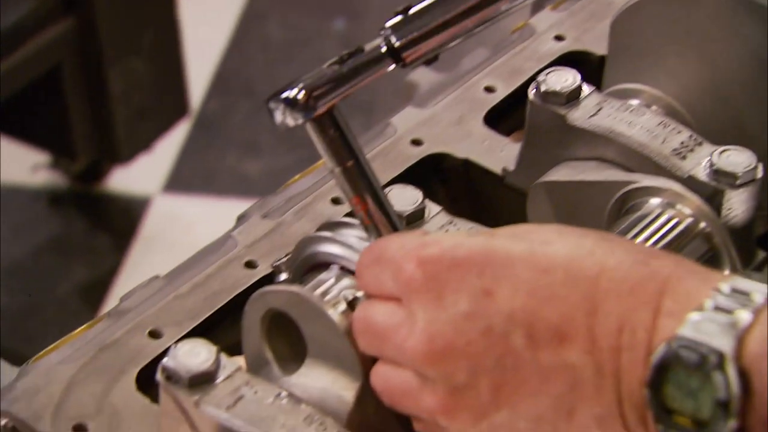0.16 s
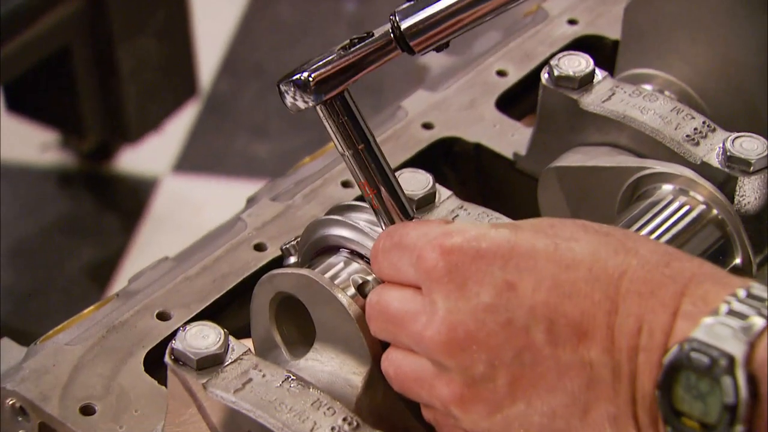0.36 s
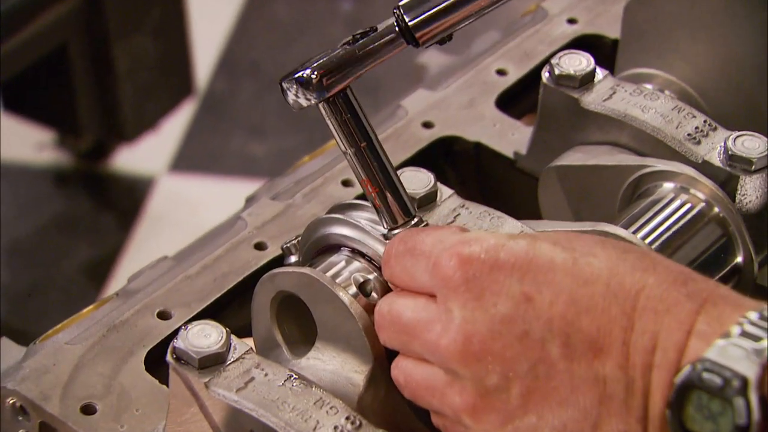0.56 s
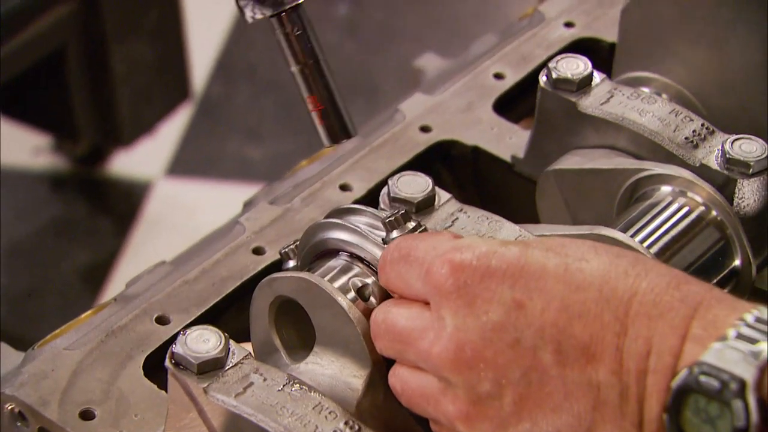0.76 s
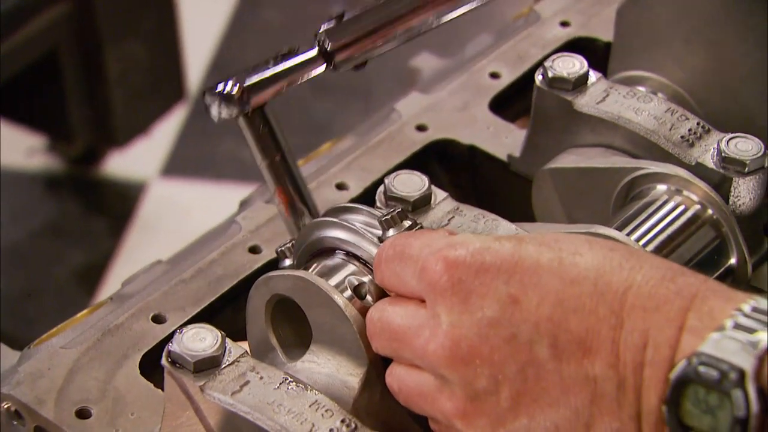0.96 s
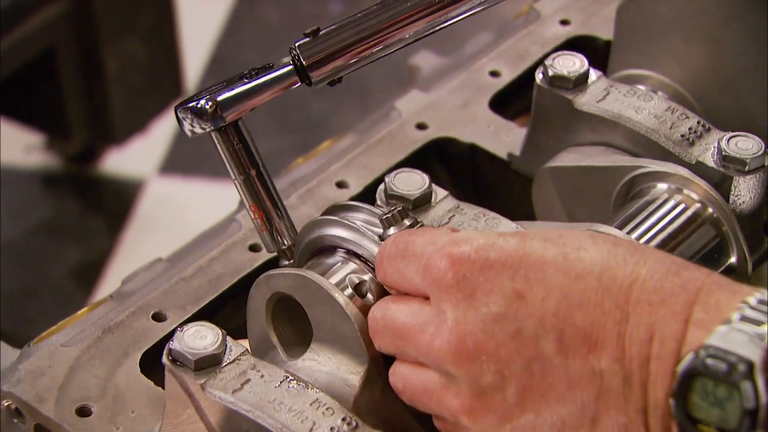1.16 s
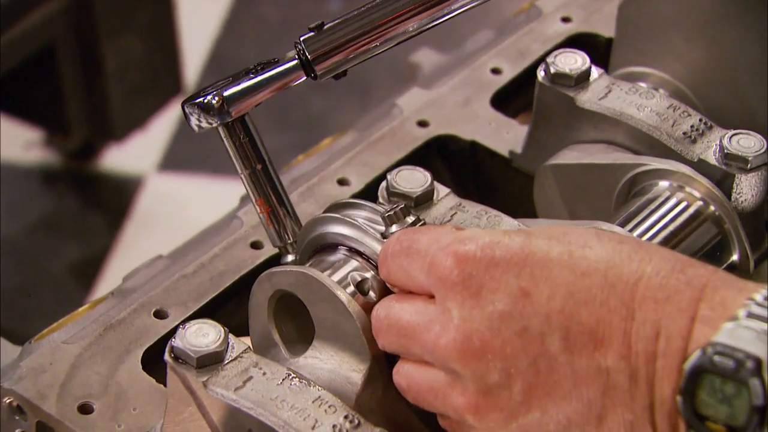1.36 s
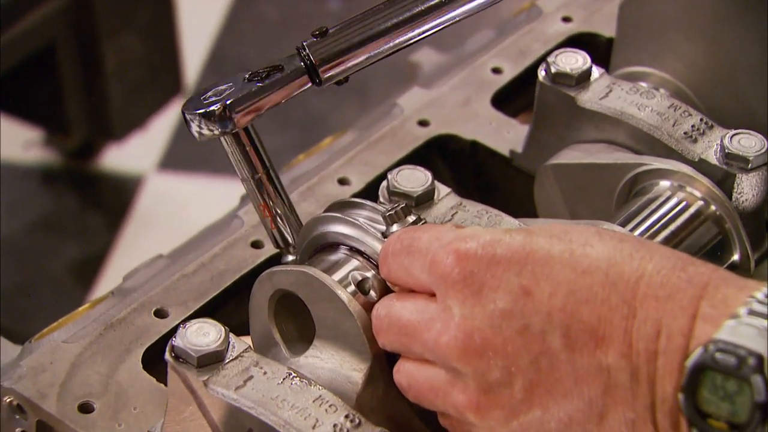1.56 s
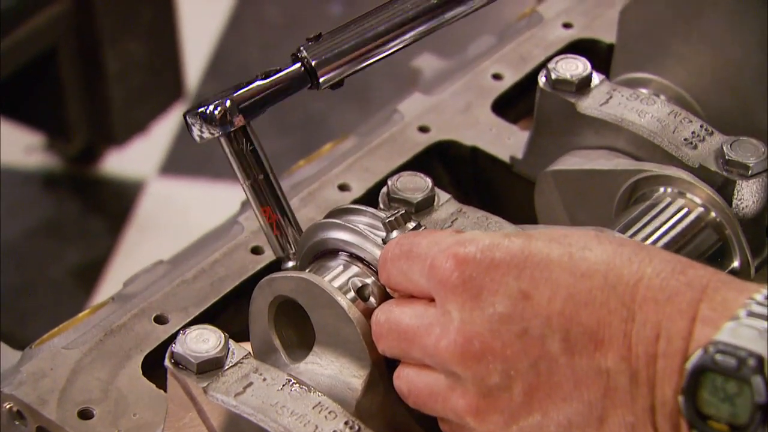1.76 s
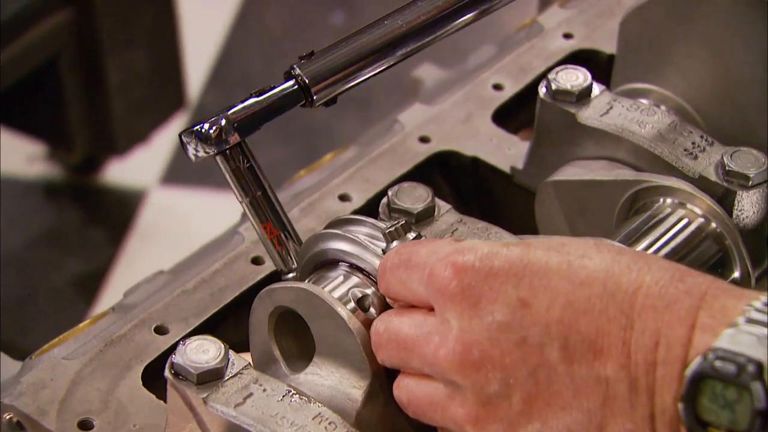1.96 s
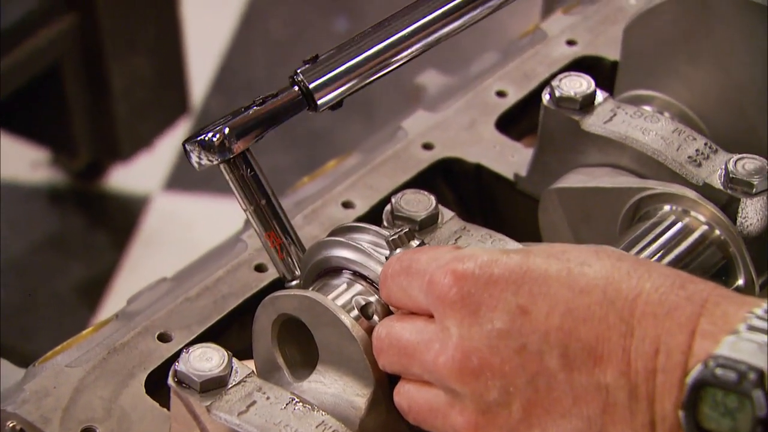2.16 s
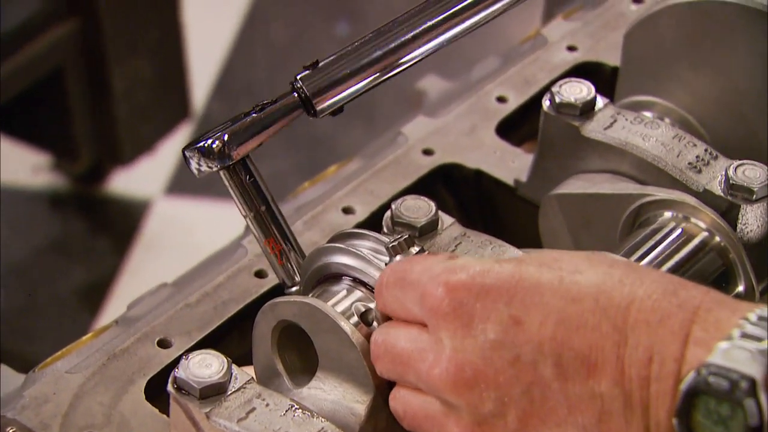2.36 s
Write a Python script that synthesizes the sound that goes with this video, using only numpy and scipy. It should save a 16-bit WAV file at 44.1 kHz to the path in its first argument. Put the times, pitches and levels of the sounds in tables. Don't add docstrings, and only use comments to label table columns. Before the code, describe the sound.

Close up, a torque wrench snaps loudly and clacks back, both clicks echoing through a big hall. Quiet steel ticks and a brief scrape follow as the socket is seated, over faint fans and rushing air.

```python
import sys
import numpy as np
from scipy import signal
from scipy.fft import rfft, irfft, next_fast_len
from scipy.io import wavfile
from scipy.ndimage import map_coordinates

SR = 44100
rng = np.random.default_rng(int(sys.argv[2]) if len(sys.argv) > 2 else 0)


def to_wav(s):
    ch = np.atleast_2d(s).T
    pcm = np.round(np.clip(ch, -1, 1) * 32767)
    wavfile.write(sys.argv[1], SR, pcm.astype(np.int16))


def decibels_to_gain(level_db):
    exponent = np.asarray(level_db, float) / 20
    return 10 ** exponent


N = 105840

# [f/Hz, level/dB per Hz]
AIR_COLOUR = [(60, -23.5), (250, 2), (800, -3.5), (2500, -12), (5500, -17.5), (7500, -27), (9500, -37.5),
              (16500, -47.5)]
# [f/Hz, width/Hz, level/dB]
FAN_DRONES = [(79.21, 9.4, -59), (130.42, 9.4, -61), (183.3, 12, -71.5), (250.4, 30, -77.5)]
# [f/Hz, level/dB]
EARLIER_COLOUR = [(1000, -30.5), (2500, -10.5), (5000, 1.5), (6500, -4), (8500, -21.5)]
# [f/Hz, t60/s]
HALL_T60 = [(200, 1.), (1000, 1.2), (4000, 1.085), (7000, 0.85), (10000, 0.52), (16000, 0.45)]
# [f/Hz, level/dB]
HALL_COLOUR = [(200, -12), (1000, -9), (4000, 1.5), (9000, -1.5), (11000, 2.5), (16000, -4.5)]
# [f/Hz, level/dB]
THREAD_COLOUR = [(3000, -16.5), (6000, 12), (11000, -18), (14500, -17)]
# [f/Hz, level/dB]
LIFT_COLOUR = [(200, -18.5), (380, 3), (700, -11), (1050, -0.5), (1400, -37)]
# [t/s, length/s, start f/Hz, end f/Hz, level/dB]
SQUEAKS = [
    (.640, 0.0144, 12400, 13600, -62),
    (0.644, 0.0143, 12000, 12400, -69),
    (.647, 0.0103, 13900, 14300, -68.5),
    (.653, 0.0102, 14800, 14900, -63.5),
    (0.659, .014, 15100, 15500, -84.5),
    (0.661, 0.0126, 12130, 11900, -70),
    (0.663, 0.012, 11270, 11200, -70),
    (1.56, .16, 9450, 9200, -94),
    (1.58, .1, 12900, 13900, -97),
    (1.753, .2, 11270, 11000, -99),
]
# [f/Hz, level/dB]
SCRAPE_COLOUR = [(500, -8.5), (1200, -3.5), (2300, 2), (3000, 5.5), (4200, -21.5), (5300, -16.5),
                 (9000, -34)]
# [t/s, peak level/dB, brightness/dB per octave, contact f/Hz]
KNOCKS = [(1.0383, -34, -1, 2604), (1.0443, -30.5, 2.5, 5012), (1.0481, -36.5, -4.5, 2324),
          (1.0525, -35.5, -2, 2304), (1.059, -45.5, 0, 5300), (1.073, -52.5, -1, 5300),
          (1.081, -59, 2.5, 5040), (1.089, -56, -8, 2268), (1.0984, -36, 0, 2630),
          (1.1067, -47.5, -3, 2440), (1.1114, -46, -1, 2454), (1.122, -50.5, -3, 2634),
          (1.128, -49.5, -6.5, 2936), (1.134, -51.5, -4, 2360), (1.143, -55, -2.5, 2436),
          (1.268, -59.5, -0.5, 5010), (1.3723, -57.5, -10, 2900), (1.3775, -57.5, -9.5, 2110),
          (1.386, -59.5, -5, 1700), (1.3932, -45, -2.5, 2960), (1.400, -48, -10.5, 2262),
          (1.4070, -41.5, -4, 5548), (1.4114, -44, -4.5, 3687), (1.415, -46, -3.5, 2296),
          (1.425, -54.5, -8, 2310), (1.432, -59.5, -2, 3295), (1.5237, -54.5, 0.5, 1200),
          (1.531, -55, -4, 3292), (1.628, -51.5, -2, 3322), (1.786, -58.5, -6, 1500),
          (1.7961, -62, 5, 8110), (1.911, -58, -7, 1622), (2.1297, -69.5, 8.5, 7500)]
# [f/Hz, level/dB, t60/s]
SOCKET_TONES = [(1200, -11, 0.089), (1562.5, -9.5, 0.177), (2044, -5, 0.096), (2251.4, 1.5, 0.107),
                (2487, -1, 0.1006), (3227, -8, 0.106), (3808, -9, 0.067), (4221, -11.5, 0.101),
                (4898, -6, 0.094), (5400, -1.5, 0.0693), (6114, -9.5, 0.04), (6868, -4.5, 0.044)]
# [f/Hz, level/dB]
KNOCK_CRACK = [(300, -14), (1200, -4), (2500, 6), (4400, -4.5), (5500, 2.5), (8000, -11.5), (12000, -24.5),
               (16000, -36)]
# [t/s, peak level/dB]
TRIPS = [
    (.2419, -.6),
    (.2650, -26),
]
# [t/s, peak level/dB]
RESETS = [
    (.5246, -7.2),
    (.5345, -23),
    (.5405, -33),
    (.5484, -33),
]
# [f/Hz, width/Hz, level/dB]
TRIP_SNAP = [(1196, 250, -16.5), (1726, 350, -2.5), (2204, 320, -10), (3046, 420, -6), (3940, 460, -9.5),
             (4856, 220, -7), (5300, 290, 1), (7094, 370, -4.5), (7911, 450, -16.5), (8775, 307, -6.5),
             (10180, 300, -21), (13220, 467, -18.5), (14100, 230, -17.5), (15500, 820, -13.5)]
RESET_SNAP = [(700, 131, -24.5), (1080, 170, -21), (1903, 350, 5), (2379, 260, -6), (3719, 453, 10.5),
              (4569, 410, 6.5), (5340, 210, -5), (7500, 573, 1.5), (8650, 330, -24.5), (10150, 380, -22.5),
              (11630, 502.6, -14), (12910, 470, -20.5), (15400, 700, -18.5)]
# [f/Hz, level/dB, t60/s]
TRIP_RING = [(1184, -7.5, 0.047), (3073, -10.5, 0.13), (3820, 0, 0.045), (4494, -32, 0.0775),
             (4928, -12.5, 0.0083), (6230, -24.5, 0.081), (6740, -7.5, 0.05), (7610, -7, 0.037),
             (8442, -24, 0.25), (8573, -12.5, 0.015), (11000, 0.5, 0.03), (12371, -29, 0.44)]
RESET_RING = [(1040, -10.5, 0.013), (2377, 0, 0.0344), (3243, -17.5, 0.32), (4090, -10.5, 0.051),
              (4110, -5, 0.036), (5660, -11.5, 0.04), (5286, -6, 0.045), (7220, -12.5, 0.38),
              (8840, -20.5, 0.0324), (10100, -39.5, 0.16), (10870, -16, 0.035), (14825, -32, 0.032)]
# [f/Hz, level/dB, t60/s]
BLOCK_TONES = [(237.3, 13.5, 0.026), (295.6, -9, 0.4), (1095, -16, .14), (1171, -13, 0.15),
               (1551, -15.5, 0.15), (10970, -29, 0.31)]
# [f/Hz, level/dB]
TRIP_BLOW = [(300, -25.5), (1700, -6), (3000, -6.5), (5200, -2.5), (7500, -10), (10500, -17),
             (16000, -19.5)]
RESET_BLOW = [(300, -10), (1700, -4.5), (3500, -2), (5500, -1), (7500, -15), (10000, -24.5), (16000, -35)]
# [snap level/dB, ring level/dB, block level/dB, crack level/dB, blow into the hall level/dB]
TRIP_LEVELS = (0, -27, -33, -14.5, 14)
RESET_LEVELS = (-3, -21.5, -32.5, -11.5, 11.5)
# [f/Hz, level/dB]
REBOUND_COLOUR = [(1500, -23), (3000, -6.5), (5300, -1.5), (8000, -4.5), (11000, -15.5)]


def unit(x):
    return x / np.sqrt(np.mean(x ** 2) + 1e-20)


def along(points, hz):
    f, v = np.transpose(points)
    return np.interp(np.log(hz + 1), np.log(f + 1), v)


def filtered(x, response):
    m = next_fast_len(len(x) + 8192)
    return irfft(rfft(x, m) * response(np.fft.rfftfreq(m, 1 / SR)), m)[:len(x)]


def noise(colour, size):
    return unit(filtered(rng.standard_normal(size), lambda hz: decibels_to_gain(along(colour, hz))))


def ring(tones, t, scatter_db, rough):
    hz, db, t60 = np.transpose(tones)[:, :, None]
    chance = rng.standard_normal(hz.shape)
    sign = (-1) ** np.arange(len(tones))[:, None]
    steps = rng.standard_normal((len(tones), 2 + int(t[-1] * 250)))
    drift = np.array([np.interp(t * 250, np.arange(len(k)), np.cumsum(k) - k[0]) for k in steps])
    strength = sign * decibels_to_gain(db + scatter_db * chance - 60 * t / t60)
    return (strength * np.sin(2 * np.pi * hz * t + rough * drift)).sum(0)


def swell(u):
    return np.sqrt(np.abs(np.sin(np.pi * u)))


def add(out, s, x):
    part = out[round(s * SR):][:len(x)]
    part += x[:len(part)]


def workshop():
    t = np.arange(N) / SR
    out = decibels_to_gain(-66) * noise(AIR_COLOUR, N)
    waver_db = 2.5 * map_coordinates(rng.standard_normal(60), [t * 15])
    out += decibels_to_gain(-91.5 + waver_db) * np.sin(2 * np.pi * 15734 * t)
    out += decibels_to_gain(-74 - 60 * t / 2.2) * noise(EARLIER_COLOUR, N)
    for centre_hz, width_hz, db in FAN_DRONES:
        drone = filtered(rng.standard_normal(N), lambda hz: 1 / (1 + ((hz - centre_hz) / width_hz) ** 2))
        out += decibels_to_gain(db) * unit(drone)
    return out


def hall(x):
    hz, t, z = signal.stft(rng.standard_normal(SR * 3 // 2), SR, nperseg=256)
    fade_db = along(HALL_COLOUR, hz)[:, None] - 60 * t / along(HALL_T60, hz)[:, None]
    tail = signal.istft(z * decibels_to_gain(fade_db), SR, nperseg=256)[1]
    t = np.arange(len(tail)) / SR
    near = rng.standard_normal(len(t)) * decibels_to_gain(-60 * t / 0.2) * (t > 0.003)
    tail = tail * (1 - np.exp(-t / 0.015))
    both = decibels_to_gain(-17.5) * tail / np.linalg.norm(tail) + decibels_to_gain(-14.5) * near / np.linalg.norm(near)
    return signal.fftconvolve(x, both)[:N]


def turn():
    out, u = np.zeros(N), np.linspace(0, 1, round(0.339 * SR))
    add(out, 1.5, decibels_to_gain(-79.5) * swell(u) * noise(THREAD_COLOUR, len(u)))
    return out


def lift():
    out, t = np.zeros(N), np.arange(SR // 4) / SR
    bump = decibels_to_gain(-52 - 60 * t / 0.068)
    rub = decibels_to_gain(-65.5) / (1 + (t / 0.1554) ** 8)
    add(out, 0.637, noise(LIFT_COLOUR, len(t)) * (bump + rub) * (1 - np.exp(-t / 0.00167)))
    return out


def squeaks():
    out = np.zeros(N)
    for s, length, from_hz, to_hz, db in SQUEAKS:
        u = np.linspace(0, 1, round(length * SR))
        waver = map_coordinates(rng.standard_normal((2, 20)), [[0 * u, 0 * u + 1], [8 * u, 8 * u]], order=1)
        hz = from_hz + (to_hz - from_hz) * u + 90 * waver[0]
        tone = np.sin(2 * np.pi * np.cumsum(hz) / SR)
        add(out, s, decibels_to_gain(db + 4.7 * waver[1]) * np.sin(np.pi * u) * tone)
    return out


def scrape():
    out, u = np.zeros(N), np.linspace(0, 1, round(0.0687 * SR))
    grip_db = 4 * map_coordinates(rng.standard_normal(30), [22 * u])
    add(out, 1.2, decibels_to_gain(-63.5 + grip_db) * swell(u) * noise(SCRAPE_COLOUR, len(u)))
    return out


def knocks():
    out, t = np.zeros(N), np.arange(SR // 5) / SR
    for s, db, tilt_db, contact_hz in KNOCKS:
        slope = np.clip(tilt_db, -7, 7)
        crack_colour = [(hz, level + slope * np.log2(hz / 3000)) for hz, level in KNOCK_CRACK]
        tones = [(hz, level + slope * np.log2(hz / 3000), 0.584 * t60) for hz, level, t60 in SOCKET_TONES]
        crack_and_tick = decibels_to_gain(-6.5 - 60 * t / 0.01766) + decibels_to_gain(-2 - 60 * t / 0.00202)
        crack = noise(crack_colour, len(t)) * crack_and_tick
        contact = ring([(contact_hz, -6, 0.0271)], t, 0, 0.97)
        socket = decibels_to_gain(-11.5) * ring(tones, t, 2.73, 0.696)
        add(out, s, decibels_to_gain(db) * (socket + contact + crack) * (1 - np.exp(-t / 0.000182)))
    return out


def rebound(tones):
    return [(hz, db + along(REBOUND_COLOUR, hz), t60) for hz, db, t60 in tones]


def pawl(events, snap, head, blow_colour, levels_db):
    out, blows, t = np.zeros(N), np.zeros(N), np.arange(SR // 2) / SR
    fast = [(hz, db, np.log(1000) / (np.pi * width)) for hz, width, db in snap]
    held = [(hz, db, min(t60, 0.08)) for hz, db, t60 in head]
    snap_db, ring_db, block_db, crack_db, blow_db = levels_db
    for s, db in events:
        bounced = s > events[0][0]
        parts = [fast, held, BLOCK_TONES]
        if bounced:
            parts = [rebound(tones) for tones in parts]
        hit = noise(blow_colour, len(t)) * decibels_to_gain(crack_db - 60 * t / 0.021 - 15 * bounced)
        hit += decibels_to_gain(snap_db) * ring(parts[0], t, 0, 0)
        hit += decibels_to_gain(ring_db) * ring(parts[1], t, 2.7075, 0.9)
        hit += decibels_to_gain(block_db) * ring(parts[2], t, 0, 0.47)
        hit *= (1 - np.exp(-t / 0.000583)) ** 2
        add(out, s, decibels_to_gain(db) * hit / np.abs(hit).max())
        blows[round(s * SR)] = decibels_to_gain(db + blow_db)
    blow = filtered(blows, lambda hz: decibels_to_gain(along(blow_colour, hz)))
    return out + hall(decibels_to_gain(-21) * out + blow)


def scene():
    small = turn() + lift() + squeaks() + scrape() + knocks()
    trips = pawl(TRIPS, TRIP_SNAP, TRIP_RING, TRIP_BLOW, TRIP_LEVELS)
    resets = pawl(RESETS, RESET_SNAP, RESET_RING, RESET_BLOW, RESET_LEVELS)
    return (workshop() + small + hall(decibels_to_gain(-6) * small) + trips + resets)[None]


def low_pass(x):
    return signal.sosfilt(signal.butter(12, 16830, fs=SR, output="sos"), x)


def record(dry):
    def microphone(hz):
        low_cut = (1j * hz / (55 + 1j * hz)) ** 3
        return low_cut * decibels_to_gain(-12 * (hz / 16500) ** 30)

    mix = filtered(dry[0], microphone)[None]
    return low_pass(mix)


dry = scene()
out = record(dry)
to_wav(out)
```